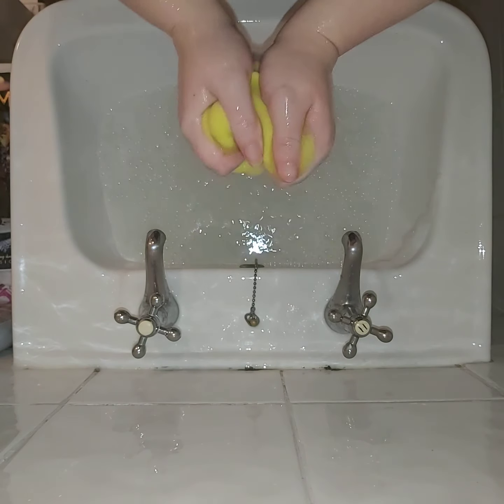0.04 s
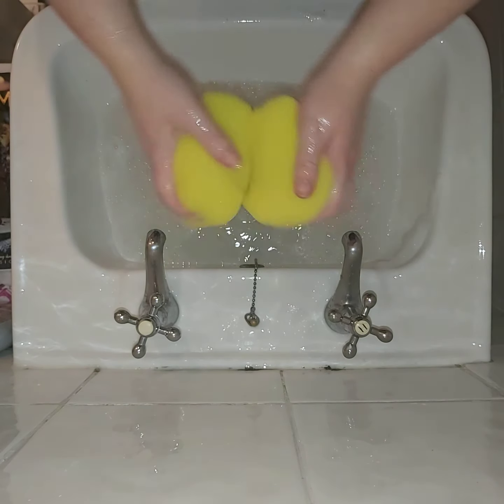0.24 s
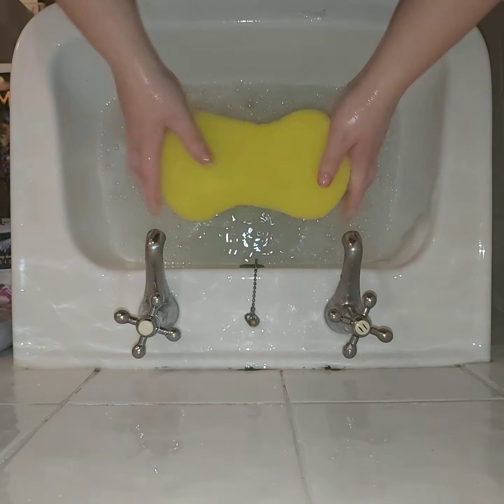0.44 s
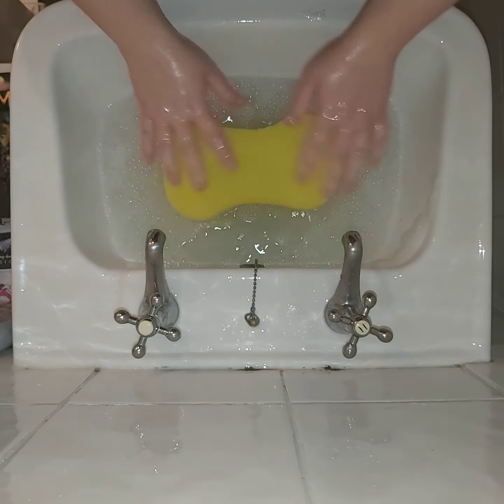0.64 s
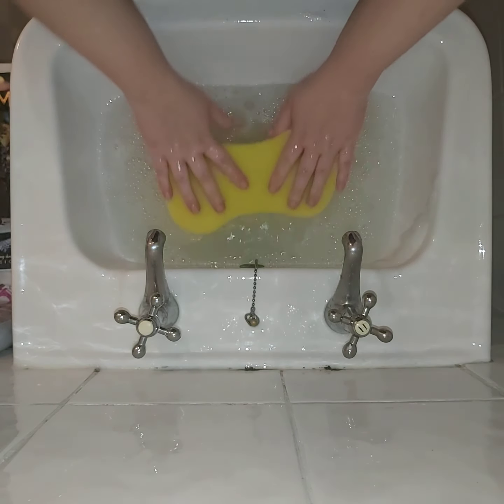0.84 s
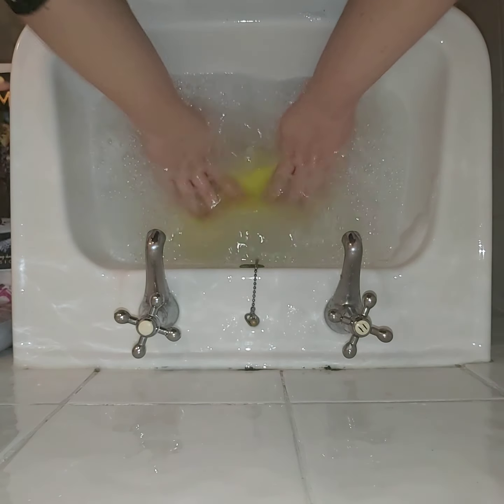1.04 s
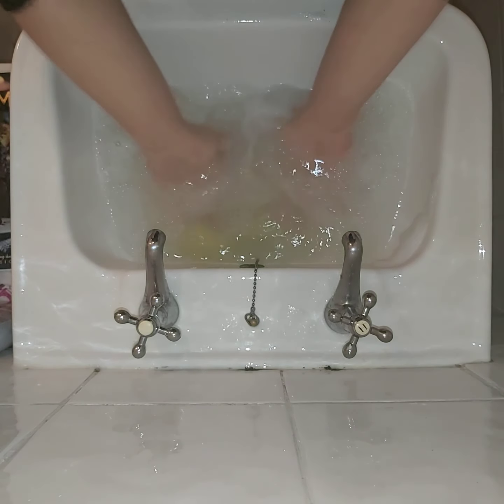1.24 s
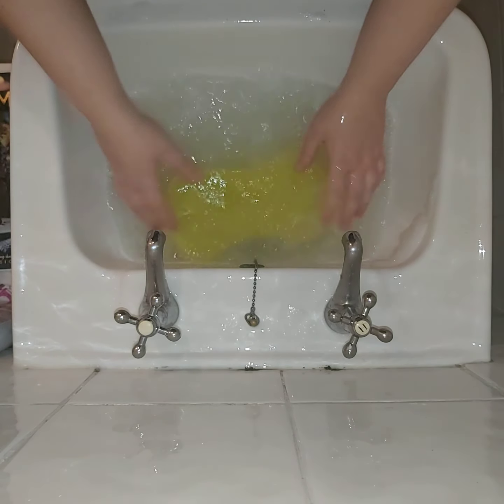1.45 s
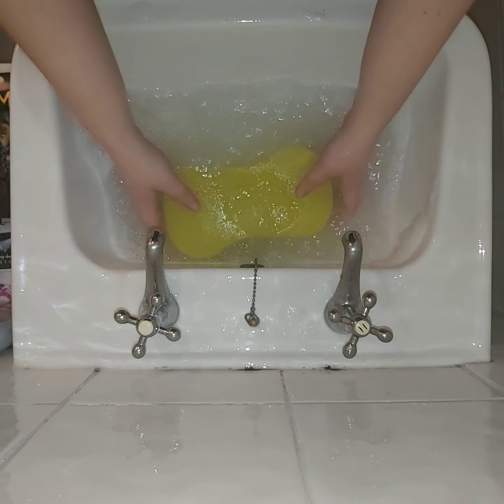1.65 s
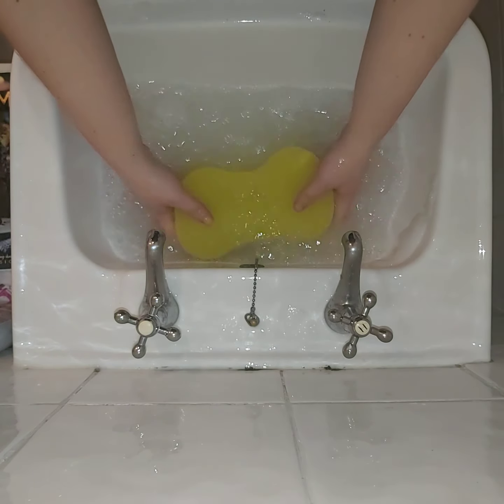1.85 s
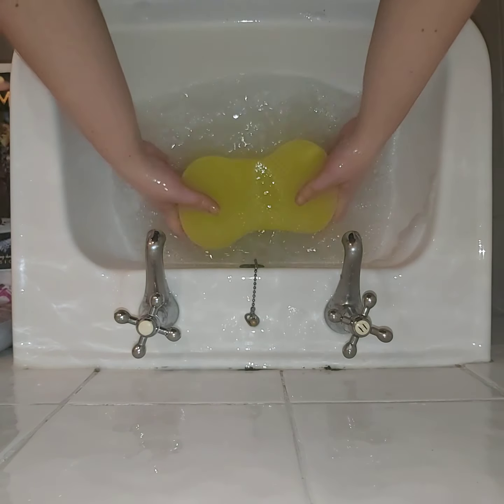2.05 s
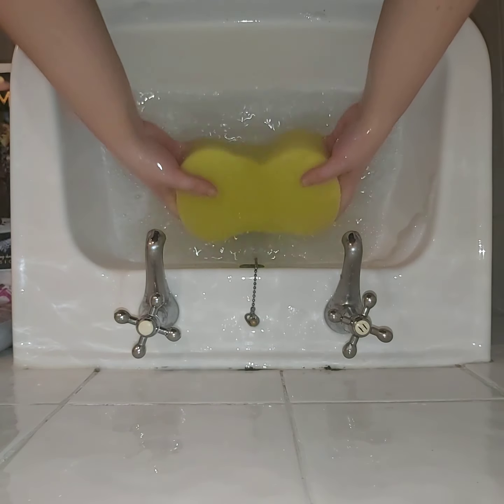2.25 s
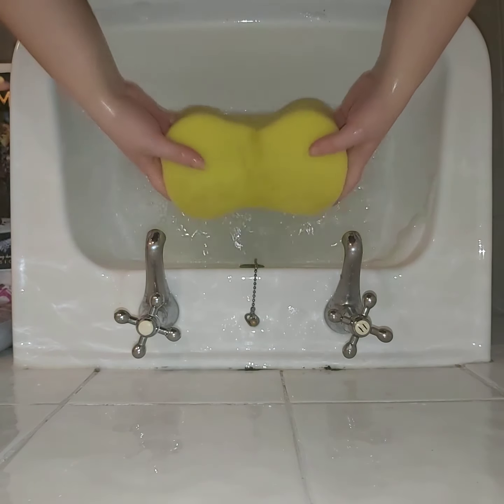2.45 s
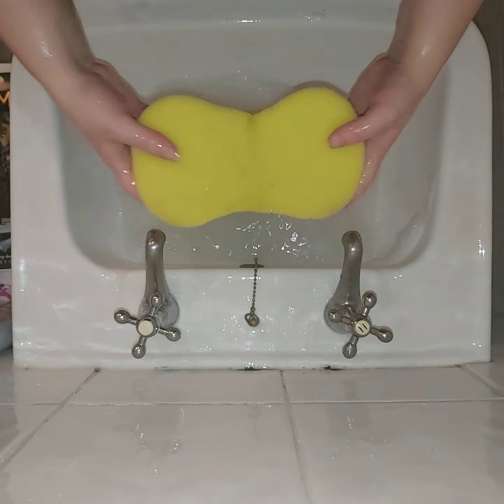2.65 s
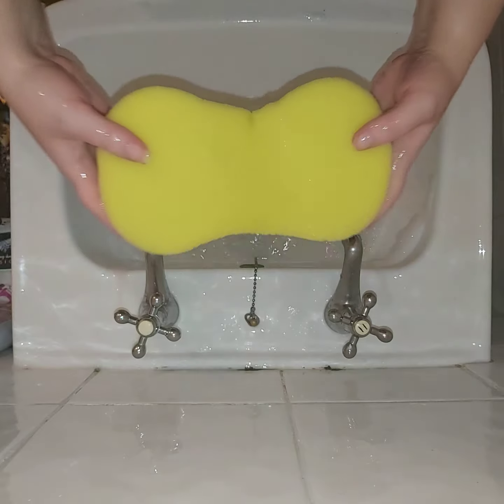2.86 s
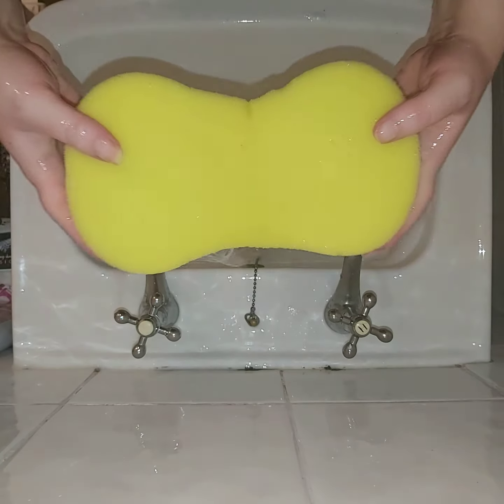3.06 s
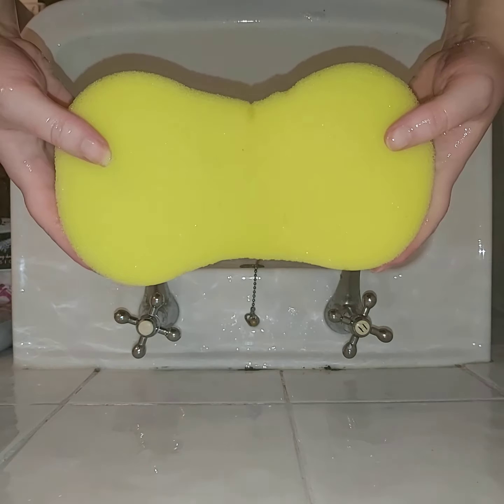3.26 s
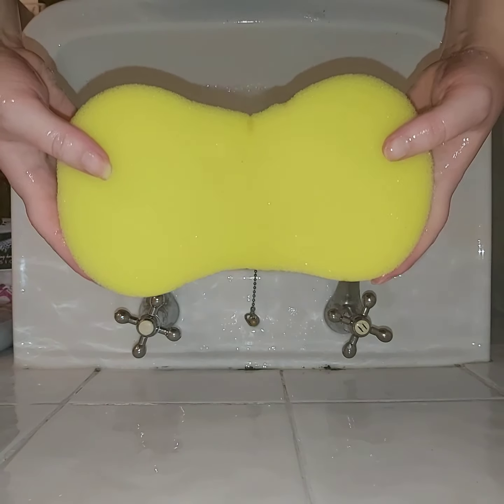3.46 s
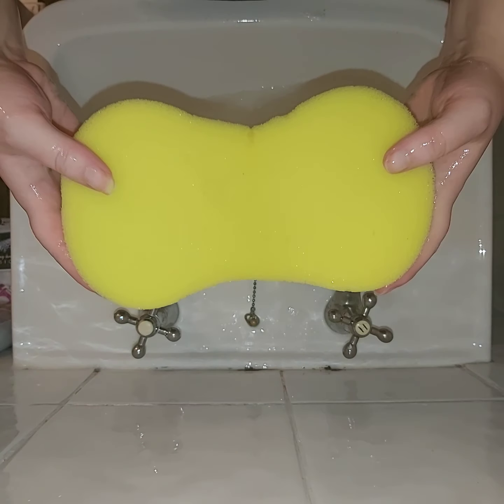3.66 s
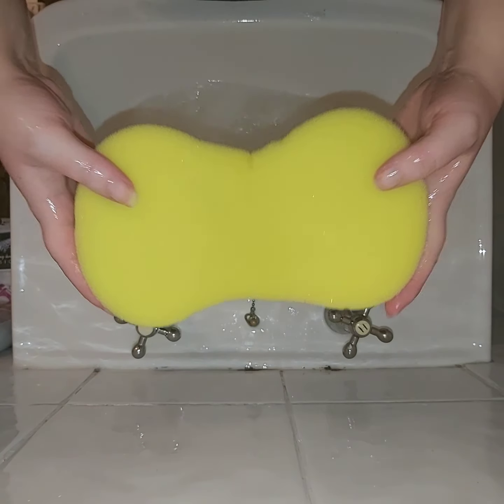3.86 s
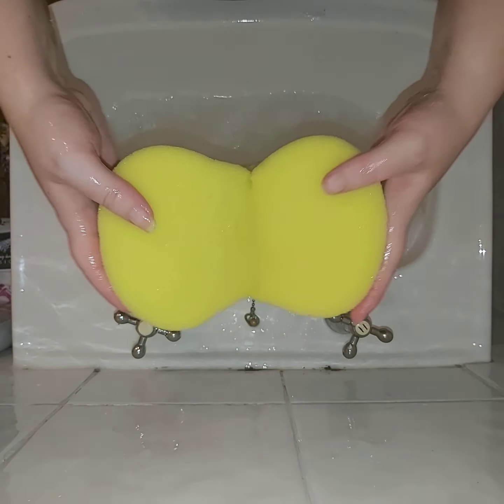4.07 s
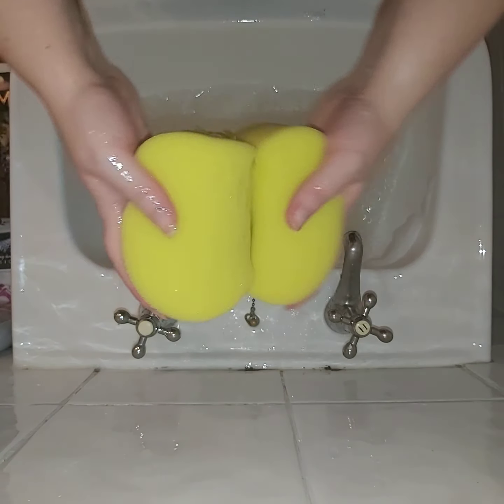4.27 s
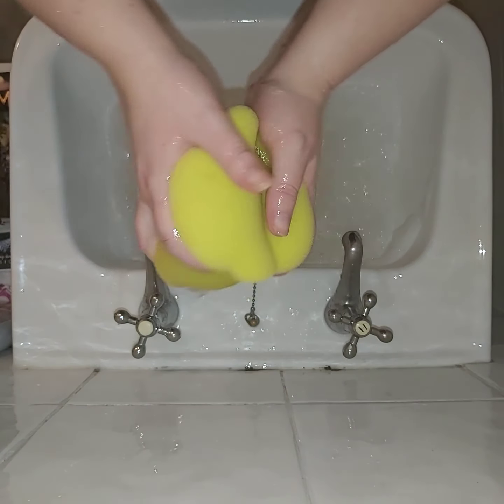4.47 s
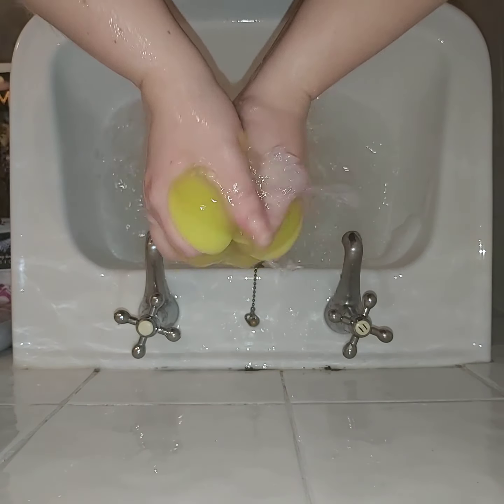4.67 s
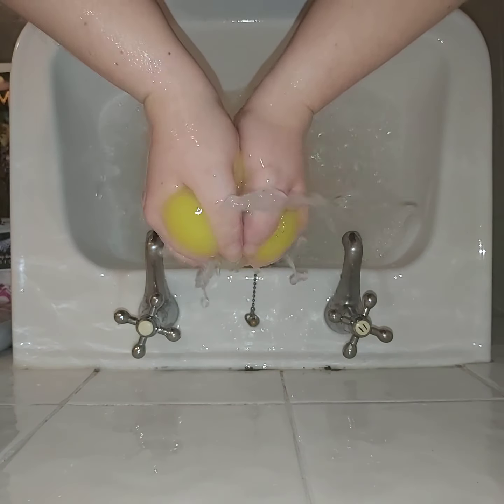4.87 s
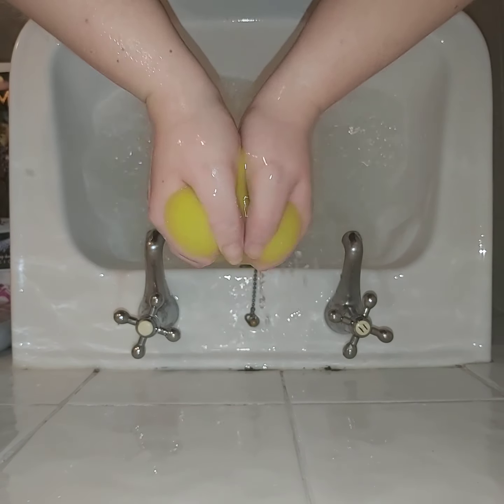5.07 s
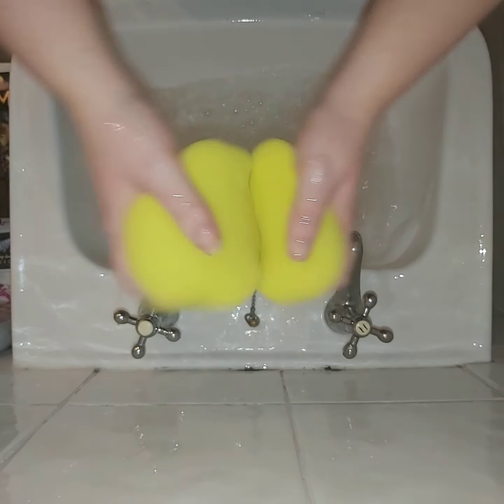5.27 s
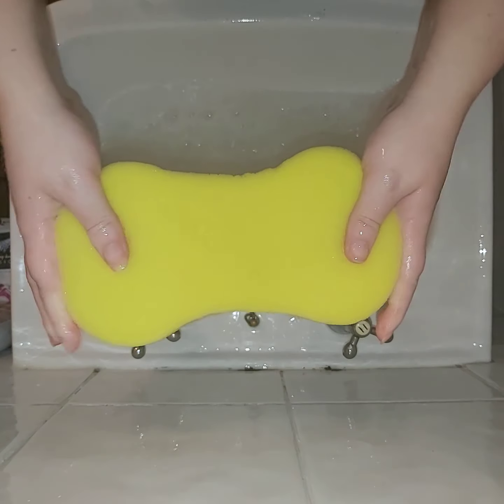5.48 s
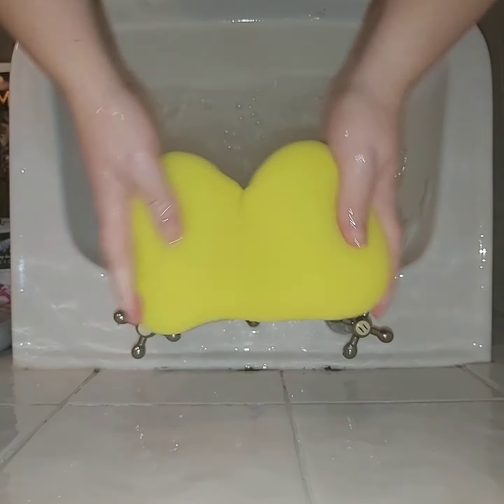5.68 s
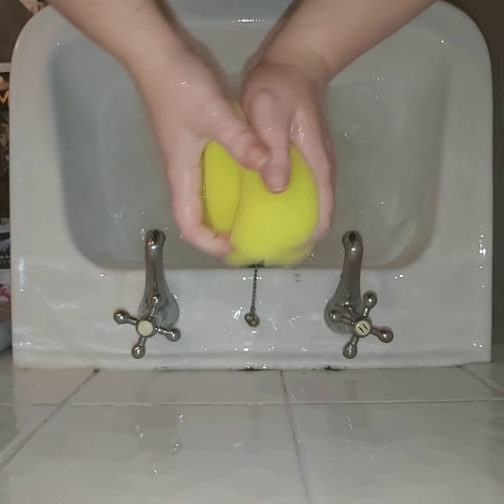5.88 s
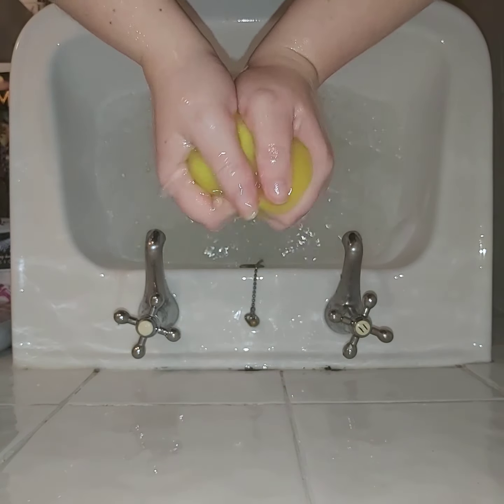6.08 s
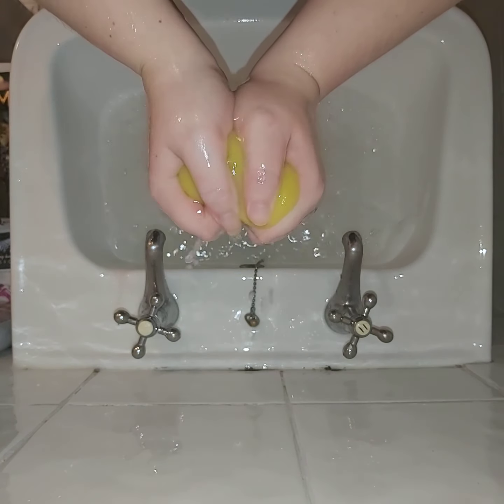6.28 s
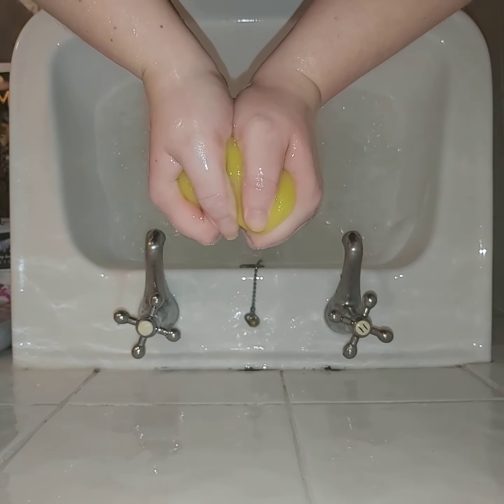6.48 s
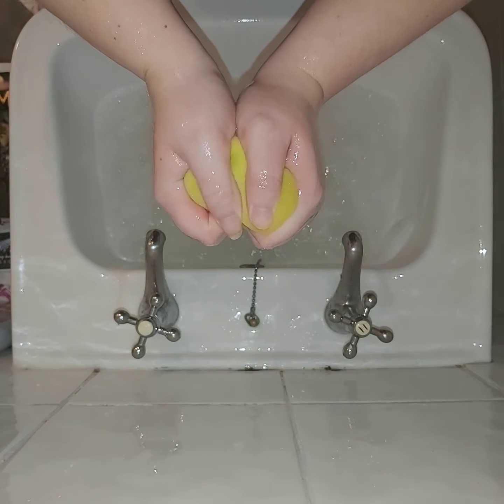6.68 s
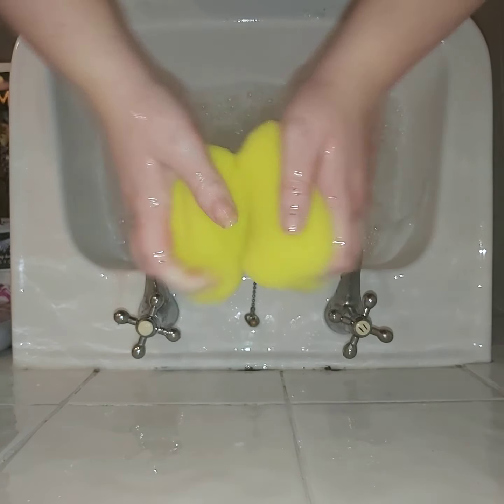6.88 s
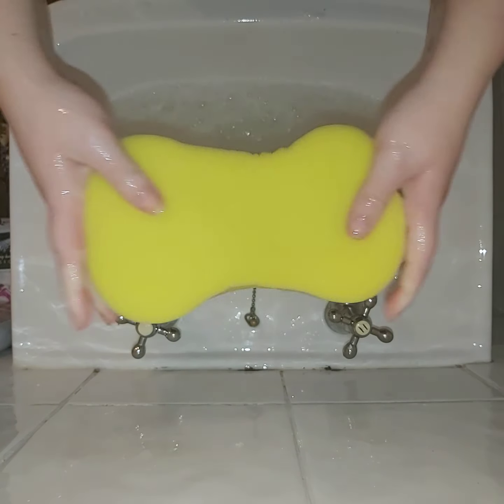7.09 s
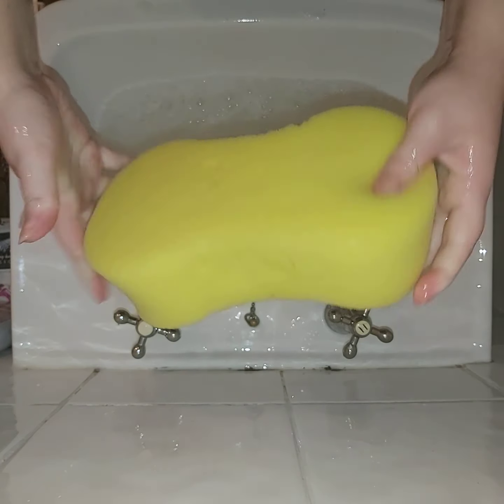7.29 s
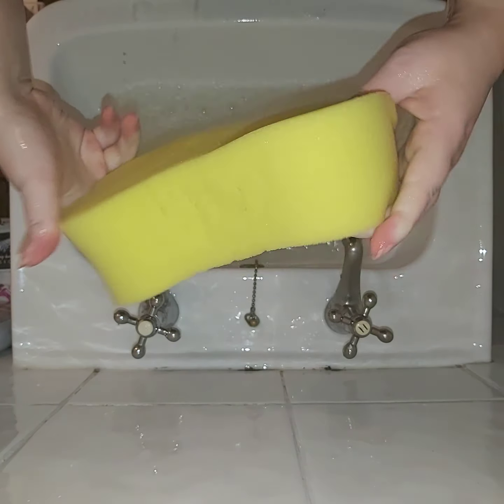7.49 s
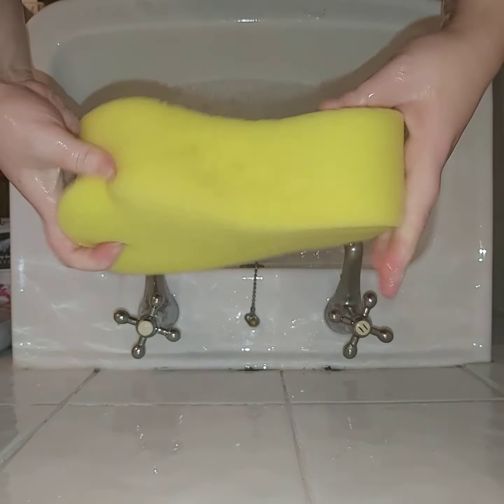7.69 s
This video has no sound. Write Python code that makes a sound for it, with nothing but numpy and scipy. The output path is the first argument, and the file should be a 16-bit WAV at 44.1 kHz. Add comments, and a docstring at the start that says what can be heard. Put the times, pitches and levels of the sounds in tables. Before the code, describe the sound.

Close up in a small tiled bathroom, water sloshes and bubbles gently as a sponge is dunked in a basin. Then a long run of splashing and glugging follows as the sponge drains and is squeezed over the water. The flow drops to a few ticks, returns in one more spattering gush, and ends in scattered drips. A low motor hum and soft air noise continue underneath.

```python
"""A small tiled bathroom, a spaced pair of microphones near a half-full basin.
A soaked foam sponge is handled over the water. The stream running off it traps bubbles of all sizes
and throws spray; the water glugs, and single drops tick and plop close to the microphones.
Behind the water a mains-driven motor hums and low air noise fills the room's resonances."""
import sys
import numpy as np
from scipy import signal
from scipy.fft import rfft, irfft, next_fast_len
from scipy.io import wavfile

SR = 44100
rng = np.random.default_rng(int(sys.argv[2]) if len(sys.argv) > 2 else 0)


def digitize_waveform(pressure):
    """Quantize a signal to 16-bit integers and store it at the path in sys.argv[1].

    Rows of a 2-D input are taken as channels; values are limited to [-1, 1].
    """
    field = np.atleast_2d(pressure).T
    bounded = np.clip(field, -1, 1)
    quanta = np.round(bounded * 32767).astype(np.int16)
    wavfile.write(sys.argv[1], SR, quanta)


N = 341334


def stream():
    """Water off the sponge: flow sets the level, and a deeper plunge traps bigger bubbles."""
    # run-off: time_s, level_db, plunge_depth (0-1), spray_above_stream_db
    flow = [(0.0, -56, 1, 5), (0.24, -66.5, 0.4, 14.5), (0.4, -77.5, 0, 11), (0.8, -69, 0, 1),
            (0.99, -47.5, 0.95, -0.5), (1.22, -49.5, 0.97, -5), (1.4, -42, 0.67, -0.5), (1.65, -42, 0, -1),
            (1.83, -63.5, 0, -3), (2.15, -62.5, 0, -9), (2.39, -71, 0.2, 15.5), (2.48, -51.5, 0.3, -4),
            (2.63, -46, 0.45, 0), (2.82, -32.5, 0.13, -2.5), (2.95, -30.5, 0.2, -2.5),
            (3.02, -26, 0.69, -2), (3.5, -29.5, 0.89, 3.5), (3.97, -27.5, 1, -0.5), (4.24, -32, 0.99, 1),
            (4.45, -24.5, 0.75, -1), (5.02, -25.5, 0.85, 0), (5.33, -31, 0.92, 1.5), (5.47, -37.5, 0.3, 0),
            (5.58, -56.5, 0, 11.5), (5.86, -65.5, 0.2, 12), (6.06, -71, 0, 11), (6.25, -56, 0.2, 6),
            (6.43, -47, 0.66, 15.5), (6.5, -32, 0.07, 5), (6.6, -32.5, 0.27, 5), (6.75, -33, 0.88, 7),
            (6.86, -38, 0.35, 7), (6.98, -34, 0.43, 1), (7.09, -49.5, 0, 7), (7.26, -77, 0.07, 16.5),
            (7.74, -76.5, 0.5, 13.5)]
    # bubble kinds, big to tiny: low_hz, high_hz, base_rate_per_s, ring_cycles, spread_db,
    # fall_db (per squared octave from the commonest pitch)
    gurgle = (133.3, 462.7, 380, 47, 2.1, 22)
    medium = (520, 1330, 1200, 20.0, 2.8, 10.0)
    small = (1400, 5200, 5000, 26.0, 2.9, 7.0)
    spray = (3920, 21000, 14000, 9.4, 2.3, 2.4)
    # commonest big and small bubble: time_s, pitch_hz
    gurgle_pitch = [(2.8, 230), (2.95, 384), (3.6, 263), (4.5, 305), (5.5, 227), (6.5, 440), (6.62, 420),
                    (6.72, 375), (6.85, 365), (6.97, 215)]
    small_pitch = [(0, 2300), (1.65, 2170), (1.8, 1700), (2.35, 1700), (2.5, 2180), (3.3, 2430),
                   (4.2, 2130), (4.7, 1930), (5.3, 2280), (6.3, 2550), (6.7, 2070), (7.1, 2560)]
    flow_db, depth, spray_above_db = in_time(flow)
    # a faint, steady low murmur under the stream
    gurgle_floor, medium_floor = from_db(2 * np.array([-56, -70.5]))
    gurgle_power = from_db(2 * (flow_db + np.interp(depth, [0, 1], [-20, -0.99]))) + gurgle_floor
    # rows from here on: medium bubbles, small bubbles, spray
    balance_db = np.array([np.interp(depth, [0, 1], [-16, -0.19]), np.zeros(N), spray_above_db])
    steady_power = from_db(2 * (flow_db + balance_db))
    steady_power[0] += medium_floor
    plunge_hz = np.interp(depth, [0, 0.5], [1050, 620])
    octaves = np.log2([plunge_hz, in_time(small_pitch)[0], np.full(N, 8000)])
    octaves += 0.39 * np.array([drift(3.36) for _ in range(3)])   # sizes wander
    splash_power, pitch_pull = splashes([medium, small, spray])
    power = steady_power + splash_power
    medium_db, small_db, spray_db = 10 * np.log10(power)
    medium_hz, small_hz, spray_hz = 2 ** ((steady_power * octaves + pitch_pull) / power)
    gurgle_db, gurgle_hz = 10 * np.log10(gurgle_power), in_time(gurgle_pitch)[0]
    clumping = drift(60)
    return (bubble_cloud(gurgle, gurgle_db - 3.1, 1.3 * drift(6.9), gurgle_hz, pitch_count=14)
            + bubble_cloud(medium, medium_db - 3.2 + 1.36 * drift(3.6), 2.3 * clumping, medium_hz)
            + bubble_cloud(small, small_db - 3.3, 2.5 * clumping, small_hz)
            + bubble_cloud(spray, spray_db - 3.4, 3.6 * clumping, spray_hz))


def splashes(kinds, attack_s=0.003):
    """Sudden gushes: their power in three bubble kinds, and that power times their log pitch."""
    # start_s, level_db, t60_s, brightness_db (step to the next smaller kind), pitch_hz
    gushes = [(0.033, -35.5, 0.022, 1.5, 9000), (0.555, -58.5, 0.17, 9, 7500), (1.04, -56, 0.13, -19, 650),
              (1.072, -41, 0.58, 3.5, 5800), (1.264, -33.5, 0.15, 5, 750), (1.39, -46, 0.26, 6, 1400),
              (1.431, -35.5, 0.19, 0, 2400), (1.52, -39.5, 0.54, -1.5, 1100),
              (1.601, -39, 0.18, -0.5, 1580), (2.44, -53.5, 0.68, -8.5, 1900),
              (2.799, -25, 0.063, -1.5, 930), (2.9, -38, 0.11, -7, 1280), (3.04, -40, 0.18, -8, 1710),
              (3.12, -29.5, 0.25, -2.5, 2300), (3.33, -31, 0.81, -1.5, 2720), (3.59, -43, 0.05, -9.5, 580),
              (3.86, -27.5, 0.2, 1.5, 2004), (3.97, -30, 0.23, 3, 3220), (4.33, -34, 0.17, 3, 2010),
              (4.45, -32.5, 0.57, 3, 1900), (4.6, -23.5, 0.53, 1, 1820), (4.832, -23.5, 0.44, -2, 1850),
              (4.85, -29, 0.25, -4, 793), (4.99, -28, 1, 4.5, 2190), (6.07, -48, 0.2, -1, 2150),
              (6.092, -43, 0.32, 6, 2600), (6.112, -44, 0.32, 7.5, 3600), (6.317, -36.5, 0.062, 7, 2520),
              (6.411, -40.5, 0.12, 8, 2980), (6.481, -33.5, 0.2, -1, 2600), (6.543, -26.5, 0.083, 6, 2200),
              (6.63, -40.5, 0.34, -2, 1160), (6.86, -34, 0.082, 3, 1500), (6.92, -39, 0.34, 2, 4300)]
    power, pitch_pull = np.zeros((2, 3, N + SR))
    t = np.arange(SR // 2) / SR
    for start_s, level_db, t60_s, brightness_db, hz in gushes:
        envelope = from_db(-120 * t / t60_s) * (1 - np.exp(-t / attack_s)) ** 2
        kind_db = level_db + brightness_db * np.array([[-1], [0], [1]])
        burst = from_db(2 * kind_db) * envelope / envelope.max()
        i = round(start_s * SR)
        power[:, i:i + len(t)] += burst
        pitch_pull[:, i:i + len(t)] += burst * np.log2([[np.clip(hz, *kind[:2])] for kind in kinds])
    return power[:, :N], pitch_pull[:, :N]


def bubble_cloud(kind, level_db, clumps_db, common_hz, pitch_count=12, max_lag_samples=14):
    """Bubbles born in random clumps, each size ringing at its own pitch from spots across the basin."""
    low_hz, high_hz, base_rate_per_s, ring_cycles, spread_db, fall_db = kind
    birth_chance = base_rate_per_s * from_db(clumps_db) / SR
    born = np.flatnonzero(rng.random(N) < birth_chance)
    kicks = from_db(spread_db * np.minimum(rng.exponential(1, N)[born], 5))
    kicks *= 2 * rng.integers(0, 2, N)[born] - 1
    pitch_index = rng.integers(0, pitch_count, N)[born]
    # the spot sets which microphone hears a bubble first
    lags = rng.integers(-max_lag_samples, max_lag_samples + 1, N)[born]
    pitches = np.geomspace(low_hz, high_hz, num=pitch_count)
    gains = from_db(-fall_db * np.log2(pitches[:, None] / common_hz[born]) ** 2) + from_db(-16)
    power = np.mean(gains ** 2, axis=0) * np.mean(kicks ** 2) * np.mean(birth_chance)
    strength = kicks * from_db(level_db[born]) / np.sqrt(power)
    out = np.zeros((2, N))
    for k, hz in enumerate(pitches):
        clicks, chosen = np.zeros((2, N)), pitch_index == k
        swarm = from_db(2.2 * drift(25, born[chosen]))   # bubbles of one size come in swarms
        heights = (strength * gains[k])[chosen] * swarm
        clicks[0, born[chosen]] = clicks[1, (born + lags)[chosen] % N] = heights
        out += bubble(clicks, hz, ring_cycles)
    return highpass(out, 0.54 * low_hz)   # bubbles push no steady air


def bubble(clicks, hz, ring_cycles):
    """Trapped air rings, swelling over its first cycles; unit energy per click."""
    radii = from_db(-60 * hz / SR / np.array([3.8, ring_cycles]))
    w = 2 * np.pi * min(hz, .45 * SR) / SR
    resonators = [[1, 0, 0, 1, -2 * r * np.cos(w), r * r] for r in radii]
    response = signal.sosfilt(resonators, signal.unit_impulse(12000))
    return signal.sosfilt(resonators, clicks + 1e-18) / np.sqrt(np.sum(response ** 2))


def plops():
    """A single bubble rises in pitch as it nears the surface; the churning water shakes its level."""
    # start_s, level_db, pitch_hz
    bubbles = [(0.94, -37, 930), (1.043, -29, 527), (1.056, -36, 785), (1.138, -30, 1540),
               (1.268, -17.5, 652), (1.269, -26, 2210), (1.307, -25, 2740), (1.29, -28, 702),
               (1.309, -24.5, 710), (1.345, -27, 890), (1.387, -27.5, 750), (1.402, -28, 810),
               (1.415, -28.5, 1430), (1.452, -23, 2410), (1.522, -24, 1040), (1.598, -24, 1050),
               (1.604, -20.5, 1830), (1.607, -33, 1380), (1.612, -23.5, 1520), (1.624, -26, 1280),
               (1.628, -27, 1760), (1.626, -25.5, 3610), (1.65, -30, 2310), (2.556, -35, 1420),
               (2.631, -30, 1870), (2.692, -25.5, 1196), (2.694, -25.5, 1490), (2.715, -25, 2820),
               (2.669, -30, 4100), (2.698, -29, 4300), (2.753, -25, 4300), (2.756, -22, 935),
               (2.801, -14.5, 874), (2.811, -25, 2430), (2.893, -18.5, 1333), (2.894, -21.5, 1056),
               (2.918, -20, 2520), (2.929, -19.5, 608), (2.991, -14, 3140), (3.0, -14, 4300),
               (3.022, -18, 700), (3.042, -16, 886), (3.043, -13, 2460), (3.046, -12, 1694),
               (3.14, -10.5, 2310), (3.159, -11, 1017), (3.288, -14, 2770), (3.291, -11, 3080),
               (3.338, -9, 2540), (3.339, -9, 3250), (3.409, -18.5, 779), (3.425, -17, 4300),
               (3.43, -17.5, 1546), (3.499, -17, 1794), (3.521, -17.5, 2530), (3.59, -6, 563),
               (3.662, -16.5, 667), (3.752, -12, 520), (3.817, -16, 935), (3.865, -10.5, 570),
               (3.878, -20, 2400), (3.882, -13, 3280), (3.984, -7, 4150), (3.985, -8, 5530),
               (3.987, -19, 1430), (4.091, -14, 4130), (4.108, -30, 1810), (4.217, -31, 2470),
               (4.235, -19, 2030), (4.318, -17, 676), (4.338, -14, 705), (4.342, -11.5, 2080),
               (4.343, -15, 1800), (4.414, -16, 660), (4.473, -13, 604), (4.473, -14, 2620),
               (4.489, -12.5, 1570), (4.521, -23, 4180), (4.599, -12.5, 745), (4.601, -11, 1830),
               (4.62, -8.5, 532), (4.617, -11.5, 1834), (4.629, -13, 1765), (4.78, -24, 1480),
               (4.789, -11, 3040), (4.824, -12, 1536), (4.826, -5.5, 1830), (4.872, -11.5, 568),
               (4.98, -16.5, 670), (5.002, -16, 540), (5.044, -16, 730), (5.102, -21, 678),
               (5.032, -15.5, 1700), (5.053, -11, 3010), (5.181, -18, 537), (5.2, -31, 537),
               (5.219, -12.5, 500), (5.308, -13, 482), (5.398, -19, 2190), (5.441, -24.5, 700),
               (5.627, -34, 3670), (5.643, -32, 3900), (5.74, -37.5, 2980), (6.078, -24, 2214),
               (6.098, -21, 2093), (6.118, -24, 3870), (6.262, -36.5, 2190), (6.32, -27.5, 2490),
               (6.323, -33, 3760), (6.413, -21.5, 2910), (6.423, -28, 2020), (6.469, -30, 1050),
               (6.474, -18, 2580), (6.487, -19, 940), (6.488, -25, 1440), (6.53, -23, 906),
               (6.567, -21, 823), (6.489, -13.5, 2700), (6.495, -23, 720), (6.515, -25, 740),
               (6.542, -19, 635), (6.546, -30, 2620), (6.542, -29, 1455), (6.549, -25, 2200),
               (6.574, -19, 540), (6.596, -14.5, 543), (6.633, -13.5, 1117), (6.652, -24, 1390),
               (6.668, -31, 1630), (6.67, -12, 4270), (6.66, -24, 1100), (6.701, -21, 760),
               (6.709, -19, 1860), (6.715, -25, 1050), (6.83, -23, 560), (6.725, -24, 1800),
               (6.743, -14, 3780), (6.786, -17, 4140), (6.863, -23, 1803), (6.864, -19.5, 578),
               (6.91, -19, 2680), (6.911, -23, 3560), (6.947, -27, 870), (6.948, -18, 1846),
               (6.972, -28, 870), (6.985, -38, 930), (7.055, -24.5, 2380)]
    return rising_tones(bubbles, t60_s=0.048, rise=2.07, attack_s=0.00068, rough=0.5, spread_db=4.5)


def glugs_and_rumble():
    """Low glugs in the water, and brief swells of the room's low rumble near 145 Hz."""
    # start_s, level_db, pitch_hz
    swells = [(2.977, -20, 370), (3.032, -12.5, 315), (3.078, -17, 372), (3.125, -14, 322),
              (3.192, -15, 299), (3.232, -24, 313), (3.271, -13, 306), (3.334, -7, 299),
              (3.367, -10.5, 310), (3.435, -14.5, 240), (3.501, -22.5, 307), (3.705, -13, 271),
              (3.846, -11.5, 275), (3.885, -14, 300), (3.95, -7, 276), (4.036, -17.5, 293),
              (4.147, -24, 290), (4.295, -8.5, 285), (4.333, -15, 300), (4.368, -14.5, 283),
              (4.41, -22, 280), (4.453, -11, 304), (4.49, -12.5, 304), (4.522, -15.5, 289),
              (4.555, -14, 297), (4.579, -13, 288), (4.609, -15.5, 300), (4.692, -8, 247),
              (4.813, -12, 255), (4.846, -12, 273), (4.879, -18, 294), (4.982, -13, 275),
              (5.077, -8.5, 253), (5.13, -16, 240), (5.185, -13.5, 237), (5.302, -13.5, 181),
              (6.605, -16.5, 379), (6.61, -22, 144), (6.66, -21, 148), (6.72, -24, 146), (6.635, -24, 371),
              (6.665, -26.5, 370), (6.703, -14, 383), (6.746, -12.5, 380.4), (6.763, -9, 383),
              (6.815, -27.5, 382), (6.84, -23.5, 398)]
    return rising_tones(swells, t60_s=0.088, rise=0.23, attack_s=0.0069, rough=0.25, spread_db=1.5)


def rising_tones(rows, t60_s, rise, attack_s, rough, spread_db, damped_above_hz=1620):
    """Short decaying tones that glide upward and flutter in level."""
    out, t = np.zeros((2, N + 6100)), np.arange(6000) / SR
    for start_s, level_db, hz in rows:
        pan_db = spread_db * rng.standard_normal()
        flutter = signal.lfilter([1], [1, -np.exp(-hz / SR)], rng.standard_normal(len(t)))
        damping = max(1, hz / damped_above_hz)   # smaller bubbles die sooner
        envelope = from_db(level_db - 2.5 - 60 * t / t60_s * damping) * (1 - np.exp(-t / attack_s))
        sine = np.sin(2 * np.pi * hz * (t + rise * t ** 2))
        tone = envelope * (1 + rough * rms_one(flutter)) * sine
        i = round(start_s * SR)
        out[:, i:i + len(t)] += tone * pan(pan_db)
    return out[:, :N]


def ticks():
    """A drop bursts on the surface in milliseconds: bright noise with a peak set by its size."""
    # start_s, level_db, pitch_hz
    drops = [(0.034, -31, 11500), (0.037, -52, 3500), (0.232, -47, 11300), (0.566, -40, 11500),
             (0.956, -26.5, 5660), (0.996, -36, 7000), (1.073, -16, 6160), (1.139, -34, 5700),
             (1.246, -39, 5650), (1.266, -22.5, 14200), (1.405, -34, 6500), (1.42, -37, 5800),
             (1.4345, -28, 4450), (1.597, -32, 7870), (2.437, -39, 9400), (2.456, -41, 7800),
             (2.556, -41, 7190), (2.589, -35, 5800), (2.657, -32, 7800), (2.747, -30, 11700),
             (2.81, -29, 12000), (2.8744, -34, 12200), (2.9268, -35, 8000), (2.991, -12.5, 11900),
             (3.026, -19, 4630), (3.058, -29, 12200), (3.1173, -26, 11700), (3.1393, -25, 11300),
             (3.211, -22, 11300), (3.232, -23, 12000), (3.3404, -23, 5570), (3.3797, -32, 12600),
             (3.4047, -40, 12300), (3.4426, -31, 12800), (3.4621, -36, 11800), (3.487, -26, 13300),
             (3.5007, -17.5, 7200), (3.5547, -18, 5030), (3.5962, -30, 14500), (3.66, -21, 5300),
             (3.709, -25, 7600), (3.7382, -18, 5900), (3.7843, -26, 11500), (3.8123, -20, 12100),
             (3.82, -20, 6200), (3.9843, -14, 7400), (4.176, -28, 12600), (4.263, -26, 11300),
             (4.3954, -28, 12400), (4.511, -22, 5680), (4.5251, -25, 14100), (4.5875, -27, 12700),
             (4.667, -18.5, 6700), (4.8075, -37, 13000), (4.8938, -18, 5700), (4.9856, -24.5, 11200),
             (5.056, -20, 12000), (5.133, -16, 7960), (5.35, -21.5, 12500), (5.422, -30, 5500),
             (5.66, -36, 8700), (5.703, -31.5, 11900), (5.714, -44, 12000), (5.7625, -34.5, 8200),
             (5.983, -36, 12600), (6.033, -45, 12100), (6.2064, -41, 8000), (6.229, -40, 12100),
             (6.267, -36.5, 7800), (6.322, -47, 5860), (6.38, -25, 5950), (6.414, -22.5, 8350),
             (6.4475, -29, 12600), (6.5084, -25, 12200), (6.548, -18, 10600), (6.579, -28, 7590),
             (6.596, -22, 6960), (6.646, -24, 7430), (6.6706, -19, 7060), (6.711, -14.5, 11800),
             (6.729, -23, 6100), (6.7403, -23, 12400), (6.744, -23, 6000), (6.788, -27, 6950),
             (6.809, -32, 6900), (6.8386, -37, 7200), (6.863, -28, 7000), (6.8746, -27, 7460),
             (6.9288, -13, 4430), (6.9479, -33, 11700), (7.0042, -40, 7800), (7.035, -26, 7800),
             (7.0707, -27, 14300), (7.1775, -38.5, 11800), (7.224, -50, 8100), (7.302, -50, 8000),
             (7.638, -38, 7800)]
    out, t = np.zeros((2, N + 1000)), np.arange(1000) / SR
    envelope = np.exp(-t / 0.0019) * (1 - np.exp(-t / 0.00034)) ** 2
    noises = rng.standard_normal((len(drops), 2, len(t)))
    pans_db = rng.normal(0, 0.94, len(drops))
    for (start_s, level_db, hz), noise, pan_db in zip(drops, noises, pans_db):
        burst = highpass(noise * envelope, min(0.82 * hz, 6460), order=4)
        tone = ring(burst, hz, t60_s=7.5 / hz)
        tick = burst / np.abs(burst).max() + 1.56 * tone / np.abs(tone).max()
        i = round(start_s * SR)
        out[:, i:i + len(t)] += from_db(level_db + 5) * pan(pan_db) * tick
    return out[:, :N]


def bathroom(flow, drops, drop_echo_db=-1):
    """Direct sound and echoes through fixed resonances; the water wanders among three echoing spots."""
    # peaks and holes of room and microphones: centre_hz, width_hz, gain_db, left_minus_right_db
    colour = [(221.4, 30, -12, 0), (297, 43.5, 3.5, -2.5), (467, 36, -9.5, 5), (601, 26, -6.5, -1.5),
              (1100, 2120, -3.5, -1.5), (1830, 1460, 2.5, -2), (4300, 310, 0.1, 12.5), (7800, 3470, 11, 13),
              (8520, 6220, -15, -12), (11800, 4800, 4.5, 2)]
    shares = from_db([15.7 * drift(4.9) for _ in range(3)])
    shares /= np.sqrt(np.sum(shares ** 2, axis=0))
    send = (flow + from_db(drop_echo_db) * drops).mean(axis=0)   # drops fall nearer and echo less
    echoes = sum(signal.fftconvolve((share * send)[None], tile_echo(), axes=1)[:, :N] for share in shares)
    out = flow + drops + echoes
    for centre_hz, width_hz, gain_db, pan_db in colour:
        w = 2 * np.pi * centre_hz / SR
        alpha, turn = np.sin(w) * width_hz / centre_hz / 2, -2 * np.cos(w)
        root_gains = np.sqrt(from_db(gain_db) * pan(pan_db)[:, 0])
        for side, a in zip(out, root_gains):
            side[:] = signal.lfilter([1 + alpha * a, turn, 1 - alpha * a],
                                     [1 + alpha / a, turn, 1 - alpha / a], side)
    return out


def tile_echo():
    """Diffuse echo of a click off the tiles: stereo noise whose high octaves die first."""
    # reverberation time: frequency_hz, t60_s
    decay_times = [(100, .4), (1000, .3), (4000, .22), (12000, .16)]
    # echo against direct sound: frequency_hz, level_db
    echo_levels = [(250, -5.5), (500, -0.5), (1000, 0.5), (4000, -2), (12000, -3.5)]
    size = SR // 2
    hz, noise = stereo_noise(size)
    t, out = np.arange(size) / SR, 0
    for centre_hz in 62.5 * 2. ** np.arange(9):
        octaves_off = np.clip(np.log2(np.maximum(hz, 1) / centre_hz), -1, 1)
        band = irfft(noise * np.cos(octaves_off * np.pi / 2) ** 2, size)
        decay = from_db(-60 * t / at_hz(decay_times, centre_hz)) * (t > .002)
        out += band * decay / np.sqrt(np.sum(decay ** 2)) * from_db(at_hz(echo_levels, centre_hz))
    return out


def motor_hum():
    """A mains-driven motor: two low tones that waver in level."""
    # pitch_hz, rms_db, left_minus_right_db
    tones = [(99.9, -46.5, 3.5), (303, -60, -7.5)]
    t = np.arange(N) / SR
    return sum(from_db(rms_db + 2.2 * drift(4.6)) * pan(pan_db) * np.sqrt(2) * np.sin(2 * np.pi * hz * t)
               for hz, rms_db, pan_db in tones)


def room_air(rms_db=-55):
    """Broad air noise and the low room modes that it excites."""
    # noise spectrum: frequency_hz, relative_db
    spectrum = [(15, -74), (25, -46), (48, -20.5), (78, -6), (108, -12), (249, -28.5), (309, -59),
                (354, -7.5), (503, -17.5), (887, -12), (1520, -33.5), (3080, -52), (7310, -34.5),
                (12200, -41), (16000, -32.5)]
    # balance across the pair: frequency_hz, left_minus_right_db
    balance = [(300, -3), (600, -8), (2500, -11), (4000, 0)]
    # room modes: centre_hz, width_hz, rms_db
    modes = [(60.4, 9.1, -66.5), (143.7, 39, -49.5), (161, 93, -69.5), (208.5, 15, -64.5)]
    size = next_fast_len(N)
    hz, noise = stereo_noise(size)
    shape = from_db(at_hz(spectrum, hz)) * pan(at_hz(balance, hz))
    air = from_db(rms_db) * rms_one(irfft(noise * shape, size))
    for centre_hz, width_hz, mode_db in modes:
        resonance = 1 / (1 + (2 * (hz - centre_hz) / width_hz) ** 2)
        air += from_db(mode_db) * rms_one(irfft(noise * resonance, size))
    return air[:, :N]


def stereo_noise(size):
    """Noise spectra as a spaced pair hears a room: alike in the bass, mostly unlike in the treble."""
    # frequency_hz, left_right_correlation
    likeness = [(60, 0.94), (200, 1), (350, 1), (640, 0.46), (1400, 0.1), (3100, -0.74), (15000, 0.18)]
    hz = np.fft.rfftfreq(size, 1 / SR)
    alike = np.clip(at_hz(likeness, hz), -1, 1)
    mid, side = rfft(rng.standard_normal((2, size)))
    return hz, (np.sqrt(1 + alike) * mid + np.sqrt(1 - alike) * side * [[1], [-1]]) / np.sqrt(2)


def drift(rate_hz, at=None):
    """Slow random wander of rms 1, at every sample or at chosen ones."""
    hop = 40
    r = np.exp(-2 * np.pi * rate_hz * hop / SR)
    slow = signal.lfilter([1], [1, -2 * r, r * r], rng.standard_normal(N // hop + 2002))[2000:]
    samples = np.arange(N) if at is None else at
    return np.interp(samples / hop, np.arange(len(slow)), rms_one(slow))


def ring(drive, hz, t60_s):
    """A resonator: a unit click sets a decaying sine ringing."""
    r, w = from_db(-60 / (t60_s * SR)), 2 * np.pi * min(hz, .45 * SR) / SR
    return signal.lfilter([0, np.sin(w)], [1, -2 * r * np.cos(w), r * r], drive + 1e-18)


def highpass(x, hz, order=2):
    """Cut the lows."""
    return signal.sosfilt(signal.butter(order, hz, "high", fs=SR, output="sos"), x)


def in_time(rows):
    """Columns of a (time_s, ...) table at every sample."""
    times_s, *columns = np.transpose(rows)
    return [np.interp(np.arange(N) / SR, times_s, column) for column in columns]


def at_hz(points, hz):
    """Read a (frequency_hz, value) table on a log-frequency axis."""
    points_hz, values = np.transpose(points)
    return np.interp(np.log(np.maximum(hz, 1)), np.log(np.maximum(points_hz, 1)), values)


def pan(left_minus_right_db):
    """Left and right gains."""
    return from_db(left_minus_right_db * np.array([[.5], [-.5]]))


def from_db(db):
    """Decibels to gain."""
    return 10 ** (np.asarray(db) / 20)


def rms_one(x):
    """Scale to rms 1."""
    return x / np.sqrt(np.mean(x ** 2) + 1e-20)


def scene():
    """Water in the bathroom over hum and air noise."""
    drops = plops() + ticks()
    flow = stream()
    return bathroom(flow, drops + glugs_and_rumble()) + motor_hum() + room_air()


def record(dry):
    """The right microphone stands a little further off; deep bass and extreme treble are cut."""
    spaced = np.array([dry[0], np.roll(dry[1], 8)])
    top_cut = signal.cheby2(14, 70, 16536, fs=SR, output="sos")
    return signal.sosfilt(top_cut, highpass(spaced, 40))


dry = scene()
out = record(dry)
digitize_waveform(out)
```